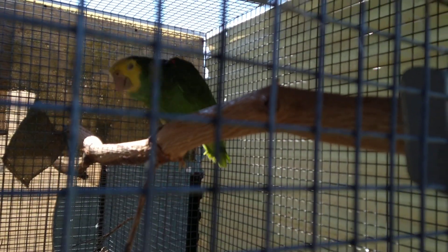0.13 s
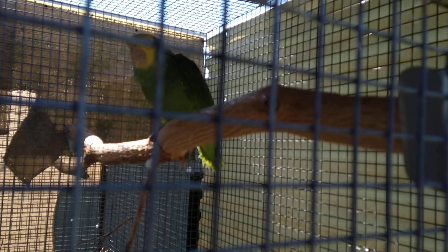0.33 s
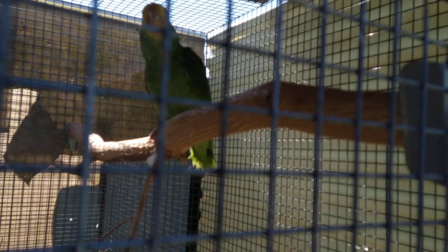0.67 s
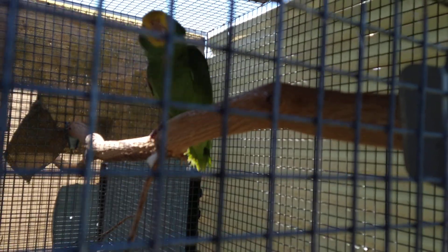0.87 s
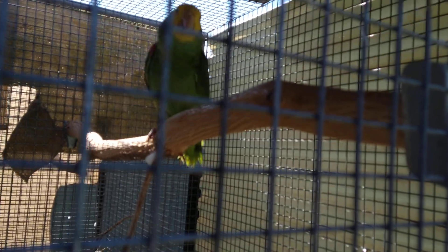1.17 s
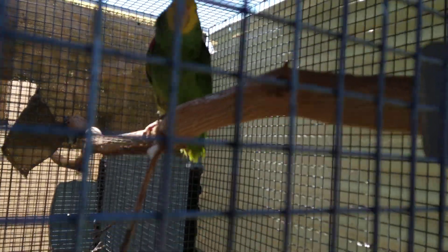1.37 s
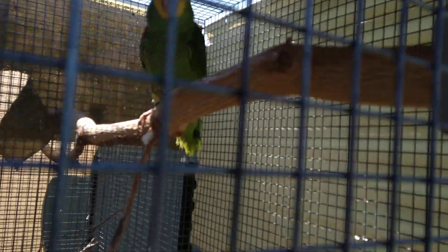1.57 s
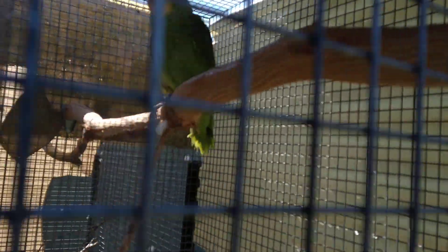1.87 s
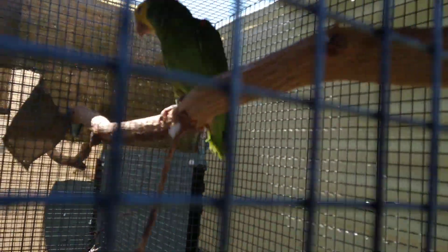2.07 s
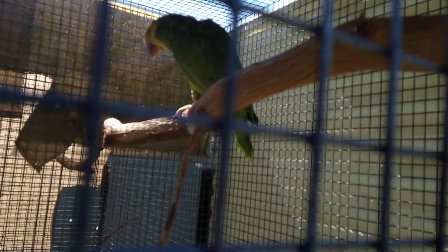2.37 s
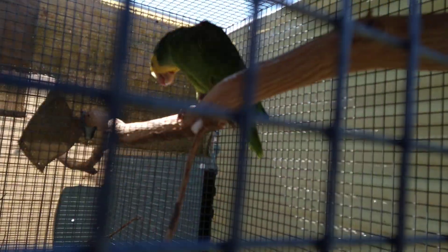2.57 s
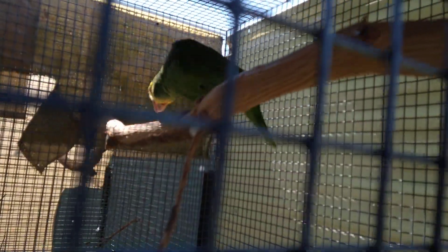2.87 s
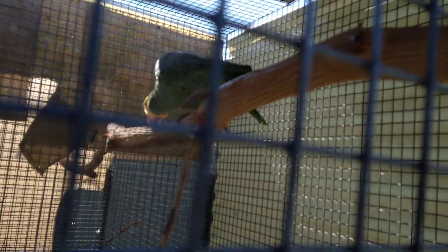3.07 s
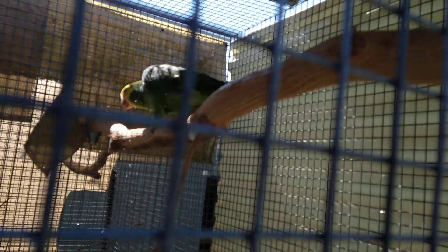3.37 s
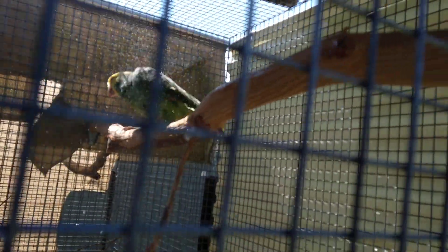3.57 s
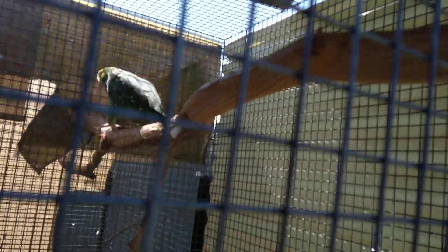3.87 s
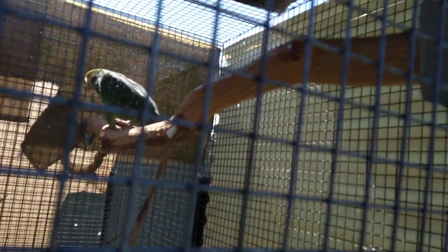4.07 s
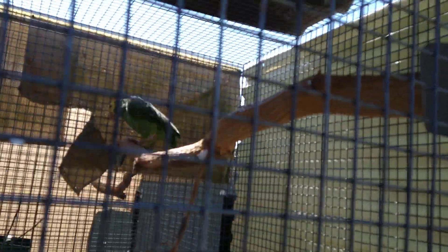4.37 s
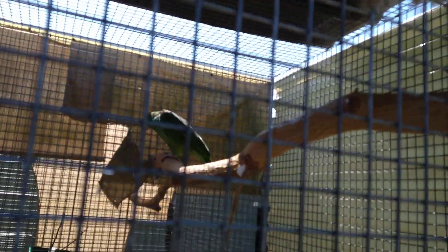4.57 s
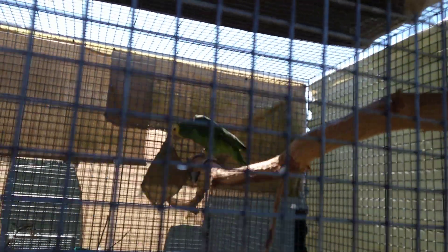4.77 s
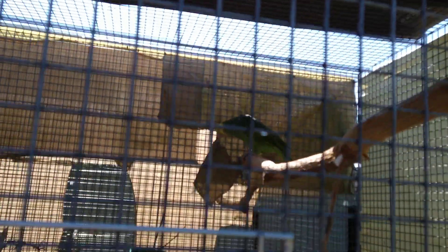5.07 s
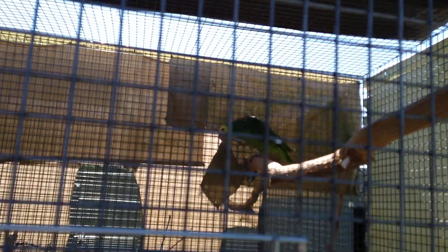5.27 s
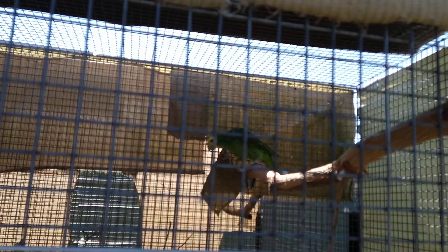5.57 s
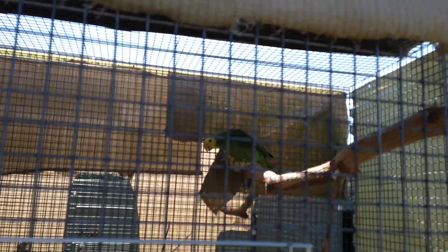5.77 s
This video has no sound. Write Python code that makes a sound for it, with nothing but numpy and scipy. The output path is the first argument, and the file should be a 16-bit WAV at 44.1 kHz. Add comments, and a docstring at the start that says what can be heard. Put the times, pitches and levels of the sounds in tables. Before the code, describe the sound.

Close plastic clicks and short hisses of a spray bottle misting a parrot, then quiet outdoor air and one softer hiss.

```python
"""In an aviary, a parrot on its perch is misted from a trigger bottle, close on the left of the microphones.
Far birds whistle first. Ten squeezes follow in four seconds: the plastic trigger snaps, the nozzle hisses,
mist lands on feathers and mesh, the spring ticks back. Meanwhile feet scuff, sleeves swish, water glugs.
Then a distant dull rush peaks, a finger taps by the right microphone and the birds call again.
A last, softer hiss comes from further right, over quiet outdoor air."""
import sys
import numpy as np
from scipy import signal
from scipy.fft import rfft, irfft
from scipy.io import wavfile
from scipy.ndimage import uniform_filter1d

SR = 44100
rng = np.random.default_rng(int(sys.argv[2]) if len(sys.argv) > 2 else 0)


def persist_wave(psi):
    """Save psi, clipped to +-1, as 16-bit WAV."""
    counts = np.round(np.clip(psi, -1, 1) * 32767).astype(np.int16)
    wavfile.write(sys.argv[1], SR, np.atleast_2d(counts).T)


N = 260631
T = np.arange(N) / SR
MIC_DELAY_S = 20 / SR  # travel time from the left microphone to the right

# Trigger snaps, close left. Each row: time in seconds, crack in dB, crack pitch in Hz, clack in dB,
# clack pitch in Hz, thud in dB, pan in dB (throughout, a positive pan favours the left microphone).
TRIGGER_SNAPS = [(0.2601, -34.5, 5130, -24.5, 2450, -35.5, 9), (0.6308, -43.5, 5250, -36, 2920, -47, 12),
                 (1.017, -32, 5200, -27.5, 2400, -38, 11), (1.3897, -28.5, 7300, -30.5, 2500, -33.5, 7),
                 (1.7877, -23, 7000, -18, 2290, -25.5, 5.5), (2.185, -25, 4320, -19, 2880, -31.5, 12),
                 (2.5817, -21, 4680, -21.5, 2340, -26.5, 12), (2.9922, -23, 4200, -18.5, 2430, -26, 12),
                 (3.408, -22.5, 5000, -17, 2340, -22.5, 11), (3.8089, -22, 7440, -18, 2150, -25, 12)]
# Squirts. Each row: valve opening in seconds, length in seconds, then hiss, valve tick and landing in dB.
NOZZLE_SQUIRTS = [(0.285, 0.058, -31.5, -34, -41), (0.668, 0.058, -31, -32.5, -44),
                  (1.044, 0.062, -31.5, -29, -42), (1.432, 0.067, -33, -35, -35),
                  (1.8194, 0.077, -27, -34, -40), (2.22, 0.075, -26.5, -32.5, -41),
                  (2.6156, 0.072, -28, -34, -40), (3.0176, 0.066, -22.5, -32, -43.5),
                  (3.435, 0.067, -23.5, -48, -62), (3.834, 0.064, -26.5, -31, -38.5)]
# Slack taken up just before most snaps. Each row: time in seconds, tick in dB, lower ring in dB.
SLACK_TICKS = [(0.251, -63, -41.5), (1.0104, -49, -39), (1.7788, -42, -30), (2.1773, -41, -33),
               (2.5724, -65, -40), (2.984, -44, -25.5), (3.395, -46, -37.5), (3.7995, -39, -33)]
# Trigger releases. Each row: time in seconds, tick in dB, lower ring in dB,
# wait until the spring chatters in seconds, chatter in dB.
SPRING_RELEASES = [(0.1135, -35, -48, 0.016, -46.5), (0.5076, -32, -47, 0.015, -43),
                   (0.8713, -30.5, -47.5, 0.016, -76), (1.2477, -31.5, -49.5, 0.017, -46),
                   (1.616, -25, -50, .0196, -42), (2.03, -33, -44, 0.02, -36),
                   (2.422, -31, -41.5, 0.025, -33), (2.8256, -32, -41.5, .0233, -35),
                   (3.2219, -33, -37, 0.021, -35), (3.6399, -31, -41.5, 0.019, -32),
                   (4.0821, -42.5, -48, 0.035, -42.5)]
# Stray plastic and grit. Each row: time in seconds, tick in dB, lower ring in dB, pan in dB.
STRAY_CLICKS = [(0.216, -76, -50.5, 9), (0.433, -55, -47.5, 4), (0.6705, -35, -33.5, 10),
                (0.922, -65, -55, 10), (1.546, -25, -49, 5), (1.55, -19.5, -37, 21), (1.5542, -22, -40, -2),
                (1.635, -42, -47, 13), (1.6643, -34, -52, -5), (2.091, -57, -43.5, 7),
                (2.2014, -37, -44, 14), (2.4844, -59, -42, 6), (2.535, -55, -41, 14),
                (2.9992, -34, -31.5, 15), (3.1155, -44.5, -44, 10), (3.692, -53, -40.5, 7),
                (3.7542, -26.5, -27, 17), (3.7575, -35, -36, 7), (3.7716, -31, -36, 13),
                (4.128, -47, -44.5, 3), (4.1405, -47, -47.5, 3), (4.187, -68, -52, 9),
                (4.4453, -48, -51.5, 6), (4.757, -69, -56, 4), (4.994, -59, -56, -4)]
# What rings on in trigger and bottle. Each row: pitch in Hz, level in dB, seconds to fall by 60 dB.
BOTTLE_MODES = [(257, -15.5, 0.068), (1026, -17, 0.055), (1250, -17, 0.035), (1850, -10.5, 0.029),
                (2300, -15, 0.012), (2750, -12.5, 0.015), (4900, -14, 0.014)]
# Water in the bottle. Each row: start and length in seconds, first and last pitch in Hz, level in dB.
WATER_GLUGS = [(1.496, 0.011, 290, 224, -34.5), (2.703, 0.041, 472, 414, -51.5),
               (2.813, 0.038, 464, 387, -41)]
# Shoes and clothes along the cage. Each row: time of full strength, hold and rise in seconds,
# then the low, middle and high band in dB.
SCUFF_STROKES = [(1.333, 0.096, 0.058, -55.5, -65, -50), (1.484, 0.077, 0.069, -48, -51.5, -47.5),
                 (1.564, 0.004, 0.004, -62, -58, -44.5), (1.664, 0.071, 0.016, -56, -49.5, -42.5),
                 (1.783, 0.11, 0.063, -51.5, -55.5, -53), (2.428, 0.032, 0.022, -90, -55.5, -53),
                 (2.694, 0.0127, 0.043, -53, -58.5, -44), (2.818, 0.056, 0.025, -53, -64, -48),
                 (3.017, 0.45, 0.17, -56.5, -44.5, -58.5), (3.043, 0.015, 0.025, -46.5, -53.5, -64),
                 (3.277, 0.043, 0.016, -61.5, -45.5, -54), (3.477, 0.016, 0.078, -45, -59, -74),
                 (3.847, 0.071, 0.055, -50.5, -49, -52.5), (3.96, 0.23, 0.03, -68.5, -80.5, -60.5),
                 (4.32, 0.039, 0.018, -78, -82, -61.5)]
# Sleeves. Each row: start and length in seconds, first and last band centre in Hz, level in dB.
SLEEVE_SWISHES = [(1.644, 0.15, 2824, 2486, -46.5), (3.229, .19, 1947, 2300, -42)]
# Far birds. Each row: start and length in seconds, first and last pitch in Hz, arch as a share of
# the pitch, level in dB, rasp as a share of the pitch, octave in dB, echo tail in dB.
BIRD_WHISTLES = [(0.004, 0.059, 2925, 2900, -0.015, -60.5, 0.004, 2, -10),
                 (0.062, 0.032, 2920, 2990, 0.013, -56.5, .004, -20, -9),
                 (3.505, 0.125, 3380, 3400, 0.043, -59, 0.018, -12, -3),
                 (4.494, 0.12, 3720, 3830, 0.0052, -66, 0.022, -25, -3),
                 (4.545, 0.075, 6120, 6300, 0.001, -72, .006, -28, 2),
                 (4.6, 0.05, 3090, 2830, -0.0049, -67, 0.025, -22, -3)]

# Levels over time. Each row: time in seconds, level in dB.
RUSTLE_LEVEL = [(0, -70.5), (.95, -67.5), (3.7, -58), (4.25, -68), (5.8, -83.5)]  # soft clothes between the scuffs
CRINKLE_LEVEL = [(0, -68.5), (.85, -64), (.98, -62), (1.25, -55.5), (1.98, -64.5), (3.9, -63), (4.5, -65.5),
                 (4.85, -64), (4.92, -65), (4.99, -59.5), (5.11, -69), (5.15, -61), (5.38, -71),
                 (5.7, -69.5), (5.85, -82)]  # dry cloth above that
FAR_HISS_LEVEL = [(5.426, -66), (5.431, -43), (5.47, -40.5), (5.51, -43.5), (5.55, -47.5), (5.59, -57),
                  (5.8, -86)]  # the last hiss, further right

# Spectra of the sources. Each row: frequency in Hz, relative level in dB.
CRACK_SPECTRUM = [(1000, -31), (2500, 5), (3400, -4.5), (4300, -3.5), (7500, -2.5), (11000, -3.5),
                  (13500, -17), (16000, -20)]  # the trigger slipping
CLACK_SPECTRUM = [(300, -57), (1000, -28.5), (1500, -11.5), (1850, 4), (2300, -0.5), (2700, -3),
                  (3300, -12.5), (4500, -18), (7000, -28.5)]  # the trigger landing
CLACK_HZ = 2280  # pitch of that spectrum before the grip shifts it
THUD_SPECTRUM = [(100, -32), (450, -14), (900, -1), (1280, 0.5), (1600, -2.5), (3000, -43.5)]  # the dull part of the landing
MIST_SPECTRUM = [(1500, -43.5), (4000, -18), (5950, -12), (6350, -4.5), (7800, -3), (9300, 0.5),
                 (11500, -2.5), (13500, -10), (16000, -15.5)]  # fine spray, close up
RUSH_SPECTRUM = [(30, -20.5), (100, -1), (400, 3.5), (1000, 3), (2200, 2), (3300, 7), (6000, -5),
                 (12000, -38)]  # the nozzle's broad rush under the spray
TICK_SPECTRUM = [(1500, -41.5), (3500, -12), (5500, -2.5), (7000, 9), (10200, 13.5), (12500, 0.5),
                 (16000, -7)]  # a bright slip of plastic
TICK_RING_SPECTRUM = [(100, -25), (300, -6.5), (1500, -8.5), (2300, 3), (3500, 3.5), (4400, -0.5),
                      (5500, 1.5), (9000, -41)]  # the lower ring after it
SCUFF_LOW_SPECTRUM = [(40, -8), (90, -0.5), (230, -0.5), (550, -1.5), (1000, -5), (1600, -24), (4000, -63)]  # soles and clothes: low rub
SCUFF_MID_SPECTRUM = [(300, -13), (800, -3.5), (1400, 2), (2100, 3.5), (2700, -2), (3600, -12),
                      (6000, -15.5), (12000, -52.5)]  # their scrape
SCUFF_HIGH_SPECTRUM = [(2000, -26.5), (4000, -14), (5700, -13.5), (7000, -8.5), (9000, -4.5), (12000, -11),
                       (14000, -23.5), (16000, -33.5)]  # their hiss
CRINKLE_SPECTRUM = [(1200, -14), (2600, -0.5), (5500, -2), (9000, 1), (12500, -4), (16000, -29)]  # dry cloth
KNOCK_SPECTRUM = [(80, -18), (200, -11), (500, -10), (900, -3), (1700, -11), (4800, -12), (6200, -23),
                  (13000, -42)]  # a fingertip on the camera body
FAR_MIST_SPECTRUM = [(500, -21), (1300, -17), (2300, -8.5), (4000, -15.5), (5700, -8.5), (6900, -10),
                     (8200, -0.5), (9700, 3.5), (12000, -2), (13500, -9), (16000, -20.5)]  # spray at a distance
TRAFFIC_SPECTRUM = [(250, -17), (700, -4), (6000, -40)]  # the dull, far rush
AIR_SPECTRUM = [(25, -33), (50, -13), (65, 9), (82, -1), (102, 4.5), (170, -3), (420, -8), (720, -13),
                (1100, -9), (1700, -8.5), (2800, -11), (4200, -19), (16000, -17)]  # outdoor air

# The aviary's echo. Each row: frequency in Hz, seconds to fall by 60 dB.
AVIARY_DECAY = [(150, 1), (1000, 0.27), (3000, 0.24), (9000, 0.11), (16000, 0.3)]
# The camera body shades the right microphone from the nozzle. Each row: frequency in Hz, loss in dB.
RIGHT_MIC_SHADOW = [(60, 15), (200, 4.5), (400, 16), (1300, 7.5), (2400, 6), (4400, 14), (8000, 27),
                    (15000, 30)]
# Colour of the right microphone's port. Each row: frequency in Hz, gain in dB.
RIGHT_MIC_COLOUR = [(4000, 0), (6500, 0.5), (8000, 4.5), (9500, -3.5), (11000, -9), (13000, -3),
                    (16000, -9)]


def trigger(slip_s=0.00056, clack_delay_s=0.0002, bounce_s=0.001342, bounce_db=-9,
            thud_delay_s=0.00054, ring_delay_s=0.001215, detune=0.044, ring_growth=0.42):
    """Close left, the trigger slips with a crack, lands with a clack, bounce and thud; the bottle rings."""
    out = np.zeros((2, N))
    mode_hz, mode_db, t60 = np.transpose(BOTTLE_MODES)[:, :, None]
    t = np.arange(4096) / SR
    hardest_db = max(row[3] for row in TRIGGER_SNAPS)
    for s, crack_db, crack_hz, clack_db, clack_hz, thud_db, pan in TRIGGER_SNAPS:
        crack, lead = burst(CRACK_SPECTRUM, decay_s=0.00031)
        lever_ring = signal.lfilter(*signal.iirpeak(crack_hz, Q=7, fs=SR), crack)  # tuned by the grip
        add(out, s - lead - slip_s, amp(crack_db) * from_left(crack + amp(2) * lever_ring, pan + 3))
        # Long waves bend round to the far microphone, so the lower parts are panned less.
        clack = click(CLACK_SPECTRUM, clack_hz / CLACK_HZ)
        add(out, s + clack_delay_s, amp(clack_db) * from_left(clack, 0.81 * pan))
        bounce = click(CLACK_SPECTRUM, clack_hz / CLACK_HZ)
        add(out, s + clack_delay_s + bounce_s, amp(clack_db + bounce_db) * from_left(bounce, pan))
        add(out, s + thud_delay_s, amp(thud_db) * from_left(click(THUD_SPECTRUM), 0.58 * pan))
        cycles = mode_hz * (1 + detune * rng.standard_normal(mode_hz.shape)) * t
        modes = amp(mode_db - 60 * t / t60) * (1 - np.exp(-2 * cycles)) * np.sin(2 * np.pi * cycles)
        ring_db = clack_db + ring_growth * (clack_db - hardest_db)  # soft squeezes barely ring it
        add(out, s + ring_delay_s, amp(ring_db) * from_left(modes.sum(0), 0.44 * pan))
    return out


def nozzle(rush_db=-13, rise_s=0.019, fall_s=0.0046, spit_db=1.0, spits_per_s=900):
    """Pressure builds with each squeeze and drops as the stroke ends; the mist sputters as it breaks up."""
    pressure = np.zeros(N)
    for start, length, db, *_ in NOZZLE_SQUIRTS:
        build = 1 - np.exp(-(np.maximum(T - start, 0) / rise_s) ** 2)
        drop = np.exp(-np.maximum(T - start - length, 0) / fall_s)
        pressure += amp(db) * build * drop
    sputter = rng.standard_normal(N) * amp(spit_db * flutter(spits_per_s))
    mist = unit(colour(sputter, MIST_SPECTRUM))
    rush = unit(colour(rng.standard_normal(N), RUSH_SPECTRUM))
    left = pressure * (mist + amp(rush_db) * rush)
    shadow = [(hz, -loss_db) for hz, loss_db in RIGHT_MIC_SHADOW]
    right = colour(np.roll(left, round(MIC_DELAY_S * SR)), shadow)
    return np.array([left, right])


def spring(pan_db=14, slips=3, slip_gap_share=0.12, slip_loss_db=1, ring_share=0.61):
    """Spring, valve and piston stick and slip, amid stray clicks; a slow release spreads the chatter."""
    out = np.zeros((2, N))
    for s, tick_db, ring_db in SLACK_TICKS:
        add_tick(out, s, tick_db, ring_db, pan_db=11)
    for s, _, _, valve_db, _ in NOZZLE_SQUIRTS:
        add_tick(out, s, valve_db, ring_db=-45, pan_db=pan_db)
    for s, tick_db, ring_db, wait, chatter_db in SPRING_RELEASES:
        add_tick(out, s, tick_db, ring_db, pan_db)
        for k in range(slips):
            slip_db = chatter_db - k * slip_loss_db
            slip_ring_db = ring_db + ring_share * (slip_db - tick_db)
            add_tick(out, s + wait * (1 + k * slip_gap_share), slip_db, slip_ring_db, pan_db)
    for row in STRAY_CLICKS:
        add_tick(out, *row)
    return out


def add_tick(out, s, tick_db, ring_db, pan_db, ring_delay_s=0.00027):
    """One slip of plastic: a bright tick and a lower ring."""
    tick, lead = burst(TICK_SPECTRUM, decay_s=0.00038)
    add(out, s - lead, amp(tick_db) * from_left(tick, pan_db))
    ring, lead = burst(TICK_RING_SPECTRUM, decay_s=0.0013)
    add(out, s - lead + ring_delay_s, amp(ring_db) * from_left(ring, pan_db))


def mist_landing(flight_s=0.024, hold_s=0.024, rise_s=0.0086, fall_s=0.032):
    """Each puff crosses to the perch and lands on feathers and mesh a moment later."""
    puffs = sum(amp(db) * stroke(s + flight_s, hold_s, rise_s, fall_s) for s, *_, db in NOZZLE_SQUIRTS)
    return puffs * diffuse(MIST_SPECTRUM)


def glugs():
    """Water shifts in the bottle with short, hollow, falling notes."""
    out = np.zeros((2, N))
    for s, length, start_hz, end_hz, db in WATER_GLUGS:
        progress, tone = glide(length, start_hz, end_hz, waver=0.06)
        swell = np.sqrt(progress) * (1 - progress) ** 2
        add(out, s, from_left(amp(db) * tone * swell / swell.max(), pan_db=2.4))
    return out


def scuffs(fall_s=0.031, grit_db=1.6, grit_per_s=120, pan_db=(4, -1, 3), rustle_db=(0, -1, -12)):
    """Along the cage, soles and clothes rub in uneven, gritty strokes over a faint rustle."""
    strokes = sum(amp(band_db)[:, None] * stroke(s, hold, rise, fall_s)
                  for s, hold, rise, *band_db in SCUFF_STROKES)
    rustle = amp(np.interp(T, *np.transpose(RUSTLE_LEVEL)))
    grit = grit_db * flutter(grit_per_s)
    bands = (SCUFF_LOW_SPECTRUM, SCUFF_MID_SPECTRUM, SCUFF_HIGH_SPECTRUM)
    out = np.zeros((2, N))
    for rub, spectrum, pan, db in zip(strokes, bands, pan_db, rustle_db):
        level = np.hypot(rub, amp(db) * rustle)
        sides_db = np.array([[pan], [-pan]]) / 2
        out += diffuse(spectrum) * level * amp(grit + sides_db)
    return out


def swishes(width_hz=950, grit_db=3.0, grit_per_s=120):
    """Sleeves slide against the body: a gritty band of noise whose pitch follows the speed of the arm."""
    out = np.zeros((2, N))
    lowpass = signal.butter(2, width_hz / 2, fs=SR)
    for s, length, start_hz, end_hz, db in SLEEVE_SWISHES:
        progress, centre_tone = glide(length, start_hz, end_hz, waver=0)
        fibres = unit(signal.lfilter(*lowpass, rng.standard_normal((2, len(progress)))))
        level = amp(db + grit_db * flutter(grit_per_s)[:len(progress)])
        add(out, s, level * np.sin(np.pi * progress) * centre_tone * fibres)
    return out


def crinkling(grain_db=2.5, grains_per_s=150, fold_db=2, folds_per_s=30):
    """Cloth crinkles lightly, in small grains that bunch up fold by fold."""
    cloth = diffuse(CRINKLE_SPECTRUM)
    level_db = np.interp(T, *np.transpose(CRINKLE_LEVEL))
    return cloth * amp(level_db + grain_db * flutter(grains_per_s) + fold_db * flutter(folds_per_s))


def finger_tap(s=4.4041, knock_db=-37, nail_db=-42, nail_lead_s=0.00097, pan_db=-18):
    """Handling noise: a fingernail, then the fingertip, taps the camera beside its right microphone."""
    out = np.zeros((2, N))
    add(out, s - nail_lead_s, amp(nail_db) * from_left(click(TICK_SPECTRUM), pan_db))
    add(out, s, amp(knock_db) * from_left(click(KNOCK_SPECTRUM, ripple_db=0), pan_db))
    return out


def far_hiss(right_db=7.0, direct_db=-7):
    """A softer, longer hiss further right, reaching the microphones mostly by way of the walls."""
    mist = unit(colour(rng.standard_normal(N), FAR_MIST_SPECTRUM))
    direct = from_left(mist, right_db)[::-1]  # mirrored to the right
    level = amp(np.interp(T, *np.transpose(FAR_HISS_LEVEL), left=-120))
    return level * (diffuse(FAR_MIST_SPECTRUM) + amp(direct_db) * direct)


def birds(flutter_db=1, flutter_db_per_rasp=130):
    """Small birds far off: thin, raspy whistles with an octave, the farther ones blurred by echo."""
    out = np.zeros((2, N))
    for s, length, start_hz, end_hz, arch, db, rasp, octave_db, echo_db in BIRD_WHISTLES:
        progress, tone = glide(length, start_hz, end_hz, rasp, arch)
        octave = amp(octave_db) * (tone ** 2 - 1)
        tremble = amp((flutter_db + flutter_db_per_rasp * rasp) * flutter(per_s=130)[:len(tone)])
        swell = np.sqrt(4 * progress * (1 - progress))
        call = amp(db) * from_left((tone + octave) * tremble * swell, pan_db=0)
        add(out, s, call)
        add(out, s, aviary_echo(call, tail_db=echo_db))
    return out


def aviary_echo(x, early_db=-16, early_s=0.0042, tail_db=-20, early_right_db=-7, tail_right_db=-2):
    """Echo of the left channel: hand, bottle and mesh scatter it at once; the walls add a faint tail."""
    t = np.arange(SR // 2) / SR
    taps = rng.standard_normal((2, len(t))) * (rng.random((2, len(t))) < .15)  # sparse reflections
    early = taps * np.exp(-t / early_s) * (t > .0012)
    hz, when, late = signal.stft(taps * (t > .008), SR, nperseg=256)
    decay = amp(-60 * when / value_at(AVIARY_DECAY, hz)[:, None])
    tail = signal.istft(late * decay, SR)[1][:, :len(t)]
    response = amp(early_db) * unit(early) * amp([[0], [early_right_db]])
    response += amp(tail_db) * unit(tail) * amp([[0], [tail_right_db]])
    return signal.fftconvolve(x[:1], response / np.sqrt(len(t)), axes=1)[:, :N]


def traffic(peak_s=4.3, hold_s=0.23, rise_s=0.39, fall_s=1.0, db=-60):
    """A dull, distant rush swells and passes, like a car on a far road."""
    return amp(db) * stroke(peak_s, hold_s, rise_s, fall_s) * diffuse(TRAFFIC_SPECTRUM)


def outdoor_air(db=-64, waver_db=0.7):
    """Quiet air all round the aviary swells and sinks a little."""
    return amp(db + waver_db * flutter(per_s=9)) * diffuse(AIR_SPECTRUM)


def amp(db):
    """Decibels to gain."""
    return 10 ** (np.asarray(db) / 20)


def unit(x):
    """Scales to rms 1."""
    return x / np.sqrt(np.mean(x ** 2) + 1e-20)


def value_at(points, hz):
    """Interpolates a table on a log-frequency axis."""
    knots_hz, value = np.transpose(points)
    return np.interp(np.log(hz + 1), np.log(knots_hz), value)


def add(mix, s, sound):
    """Mixes a stereo sound in at s seconds."""
    part = mix[:, max(round(s * SR), 0):][:, :sound.shape[1]]
    part += sound[:, :part.shape[1]]


def colour(x, spectrum):
    """Filters x by a spectrum."""
    count = x.shape[-1]
    return irfft(rfft(x) * amp(value_at(spectrum, np.fft.rfftfreq(count, 1 / SR))), count)


def from_left(x, pan_db):
    """Sound reaches the left microphone first; pan_db sets left over right at constant power."""
    pair = np.array([x * amp(pan_db / 2), np.roll(x, round(MIC_DELAY_S * SR)) * amp(-pan_db / 2)])
    return pair / np.sqrt(np.cosh(pan_db * np.log(10) / 20))


def diffuse(spectrum):
    """Noise from all sides: alike in both microphones only for long waves."""
    left, other = rfft(rng.standard_normal((2, N)))
    coherence = .9 * np.sinc(2 * np.fft.rfftfreq(N, 1 / SR) * MIC_DELAY_S)
    right = coherence * left + np.sqrt(1 - coherence ** 2) * other
    return unit(colour(irfft([left, right], N), spectrum))


def flutter(per_s):
    """A random curve of rms 1 through per_s points a second."""
    knots = np.arange(0, N / SR + 1, 1 / max(per_s, 1))
    return unit(np.interp(T, knots, rng.standard_normal(len(knots))))


def stroke(peak_s, hold_s, rise_s, fall_s):
    """An envelope that swells up to peak_s, holds and dies away."""
    return np.exp(np.minimum(T - peak_s, 0) / rise_s - np.maximum(T - peak_s - hold_s, 0) / fall_s)


def glide(length_s, start_hz, end_hz, waver, arch=0):
    """Gives the progress 0-1 and a wavering tone that slides between two pitches."""
    progress = np.linspace(0, 1, round(length_s * SR))
    bend = 1 + arch * np.sin(np.pi * progress) + waver * flutter(per_s=406)[:len(progress)]
    hz = (start_hz + (end_hz - start_hz) * progress) * bend
    return progress, np.sqrt(2) * np.sin(2 * np.pi * np.cumsum(hz) / SR)


def burst(spectrum, decay_s, size=2048, lead=128):
    """Gives a tiny coloured crack with the energy of 2 ms at level 1, and its lead-in in seconds."""
    t = np.maximum(np.arange(size) - lead, 0) / SR
    bins = rfft(rng.standard_normal(size) * t * np.exp(-t / decay_s))
    bins /= np.sqrt(uniform_filter1d(abs(bins) ** 2, size=85))  # flat overall, narrow peaks remain
    crack = colour(irfft(bins), spectrum)
    return crack / np.linalg.norm(crack) * np.sqrt(SR / 500), lead / SR


def click(spectrum, shift=1, ripple_db=4.0, size=2048):
    """One clean blow through a body with this spectrum, shifted in pitch; energy of 2 ms at level 1."""
    hz = abs(np.fft.fftfreq(size, 1 / SR))
    knots = np.geomspace(100, SR / 2, 48)
    ripple = ripple_db * np.interp(hz, knots, rng.standard_normal(len(knots)))
    gain = amp(value_at(spectrum, hz / shift) + ripple)
    minimum_phase = np.exp(np.conj(signal.hilbert(np.log(gain))))
    blow = np.fft.ifft(minimum_phase).real
    return blow / np.linalg.norm(blow) * np.sqrt(SR / 500)


def scene():
    """From beside the cage: bottle and birds with their echo, movement nearby, the outdoors behind."""
    direct = trigger() + spring() + nozzle() + glugs() + birds()
    air = outdoor_air()
    return (direct + aviary_echo(direct) + mist_landing() + scuffs() + swishes() + crinkling()
            + far_hiss() + finger_tap() + traffic() + air)


def record(dry, low_cut_hz=45, high_cut_hz=15950):
    """The microphone pair: the right port colours its side, then both lose rumble and the very top."""
    mics = np.array([dry[0], colour(dry[1], RIGHT_MIC_COLOUR)])
    mics = signal.sosfilt(signal.butter(3, low_cut_hz, "high", fs=SR, output="sos"), mics)
    high_cut = signal.firwin(511, high_cut_hz, window=("kaiser", 9), fs=SR)
    return signal.oaconvolve(mics, high_cut[None], "same")


dry = scene()
out = record(dry)
persist_wave(out)
```